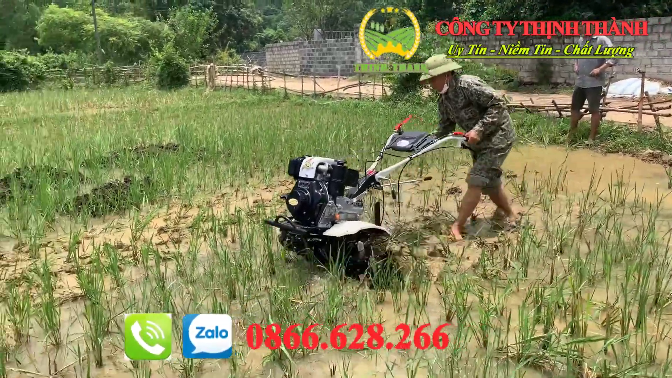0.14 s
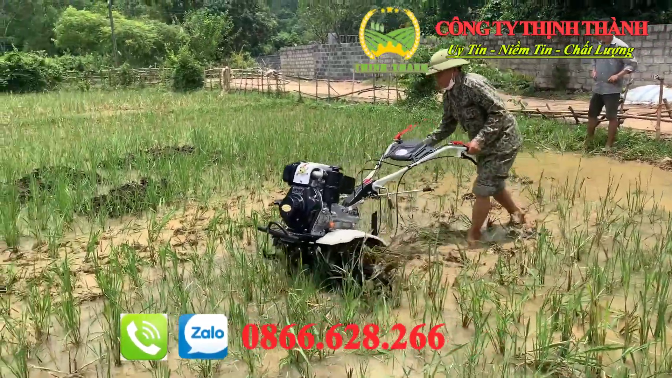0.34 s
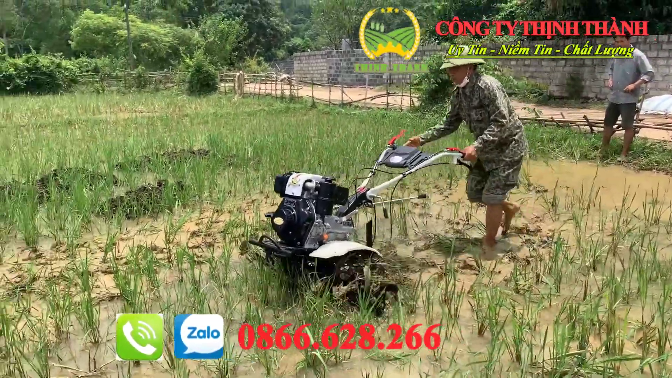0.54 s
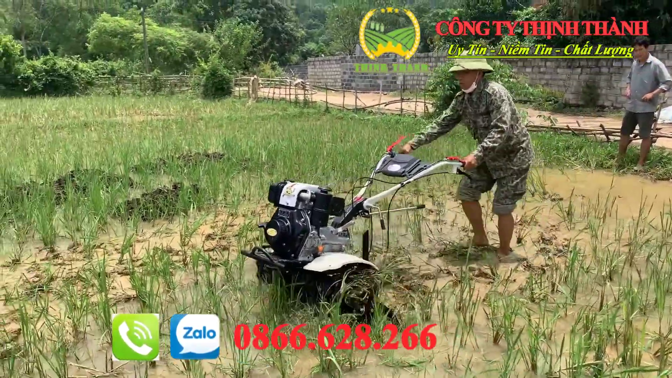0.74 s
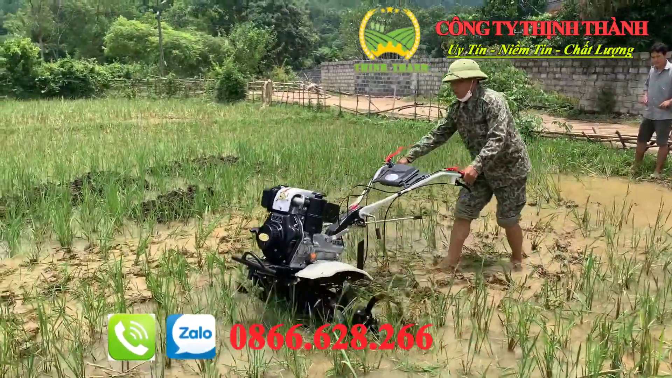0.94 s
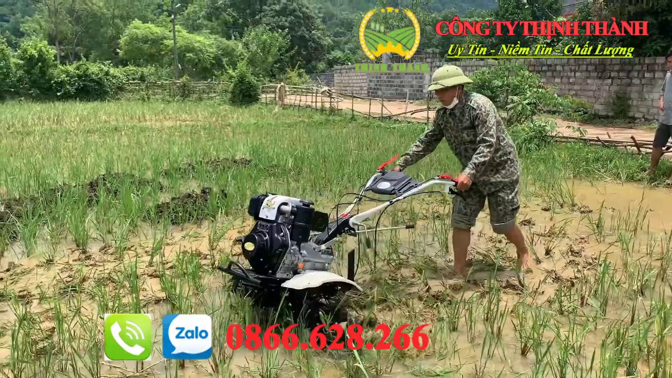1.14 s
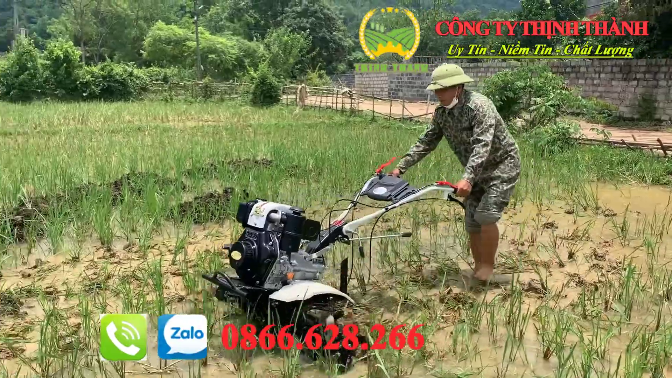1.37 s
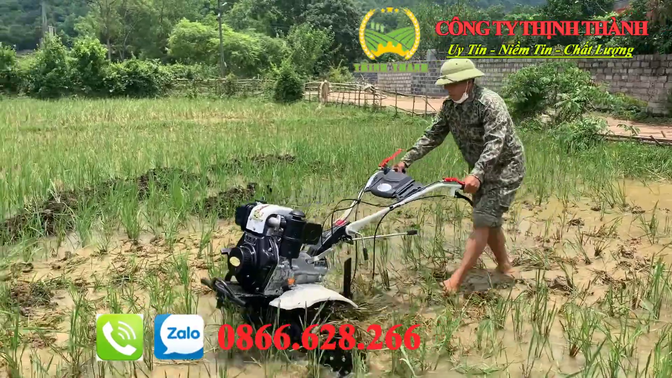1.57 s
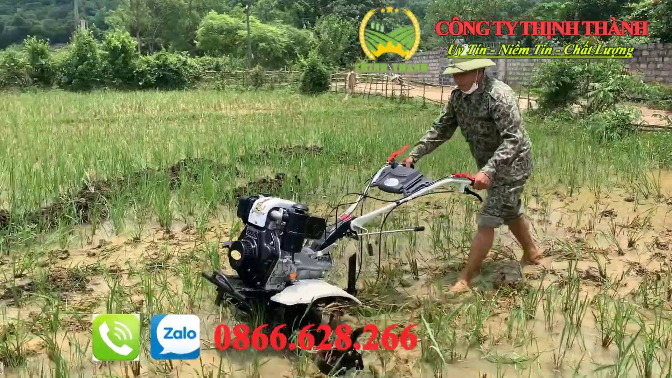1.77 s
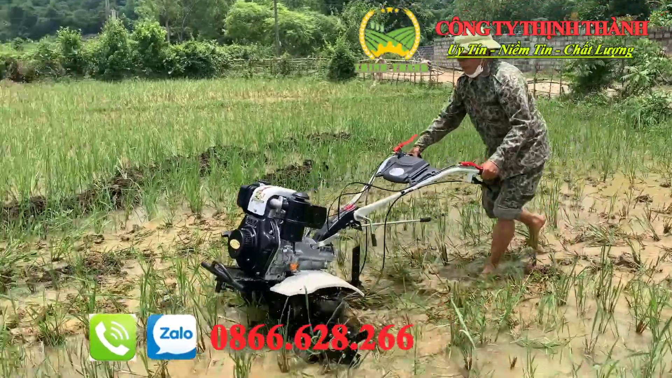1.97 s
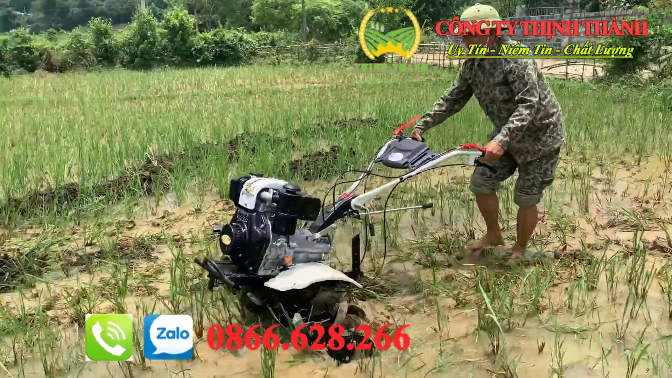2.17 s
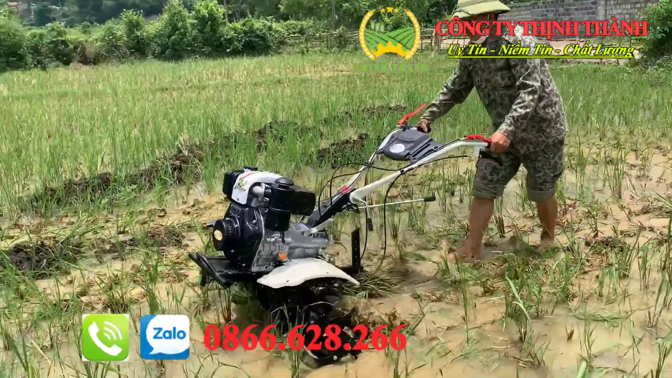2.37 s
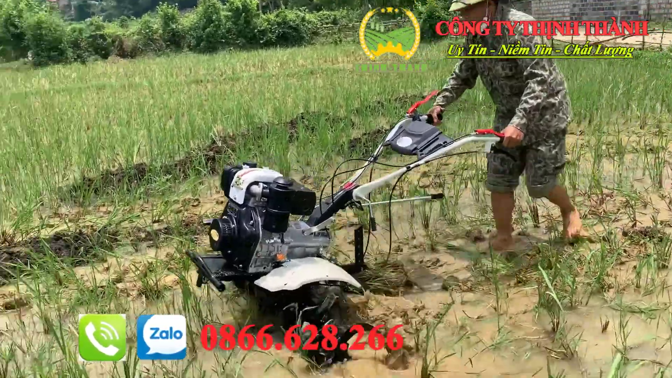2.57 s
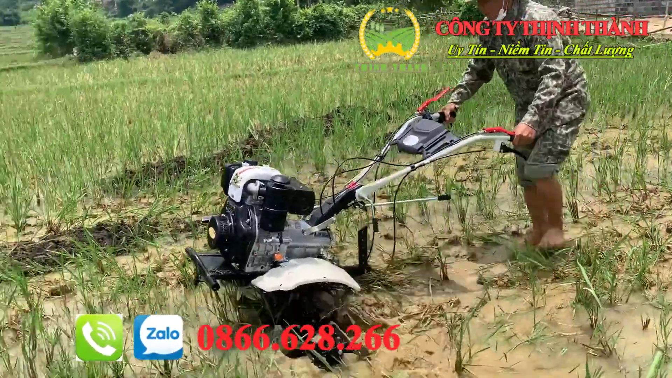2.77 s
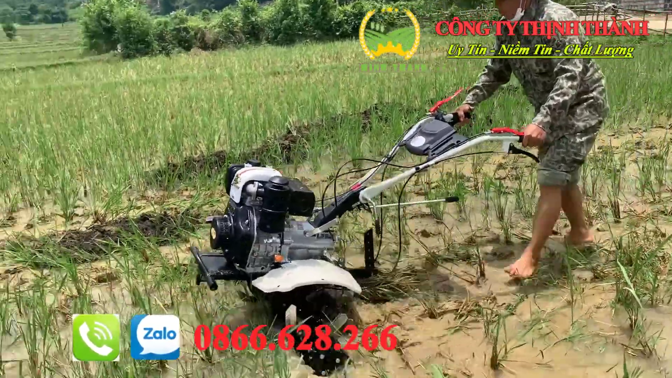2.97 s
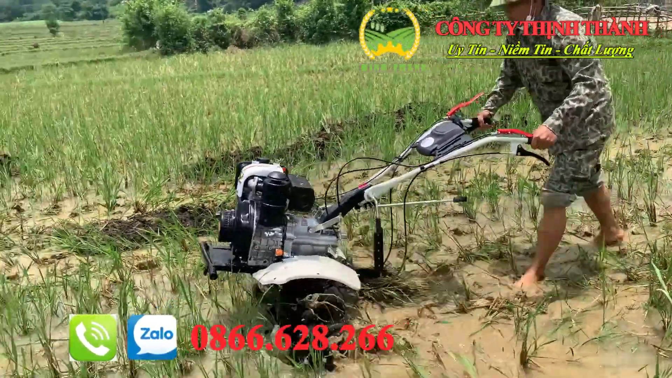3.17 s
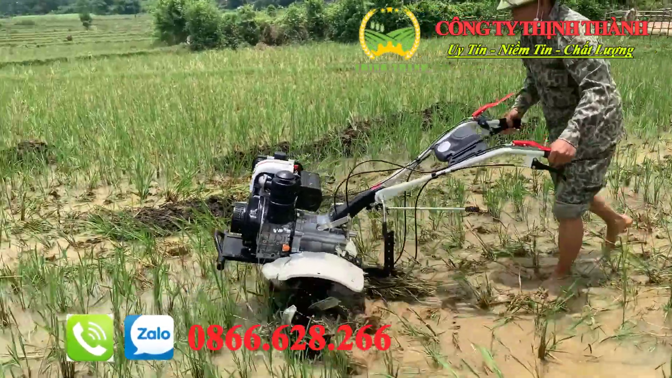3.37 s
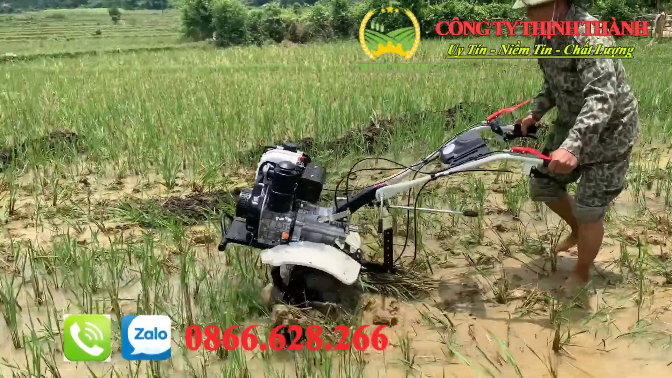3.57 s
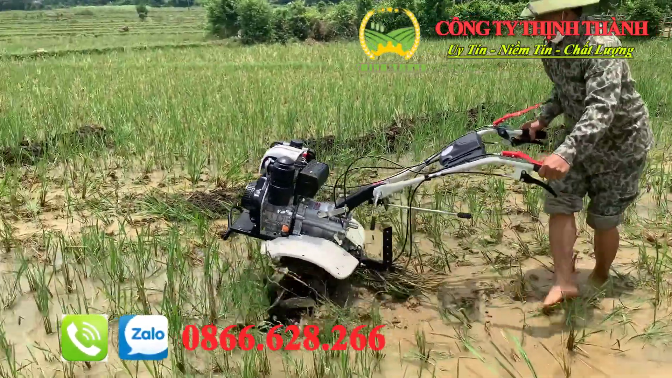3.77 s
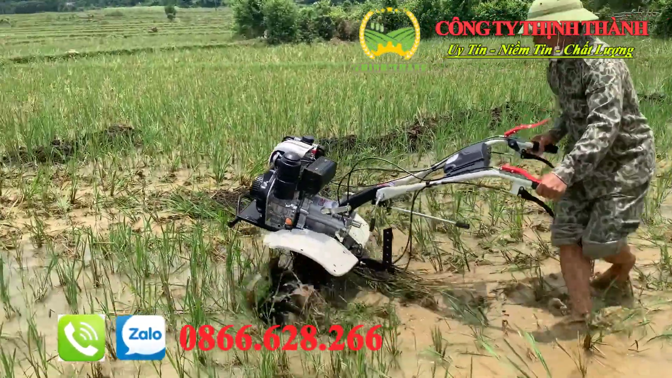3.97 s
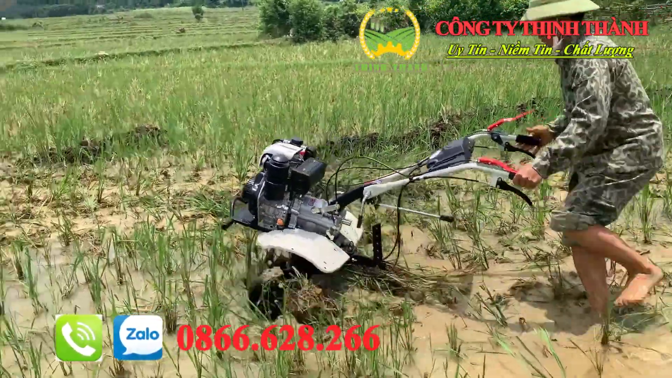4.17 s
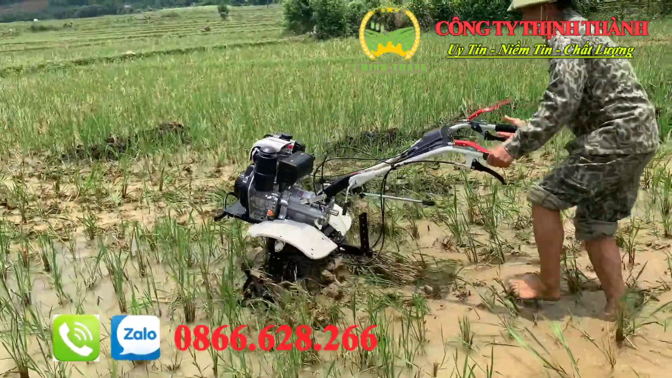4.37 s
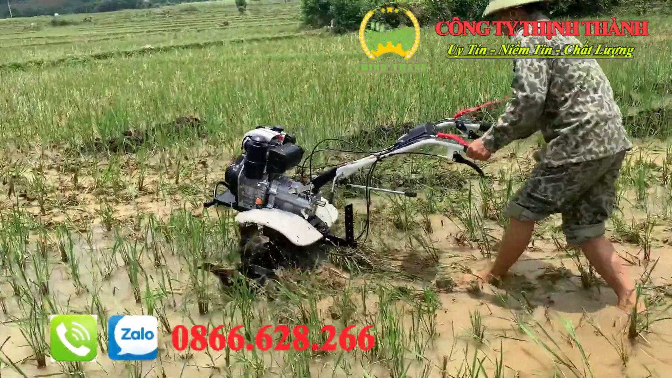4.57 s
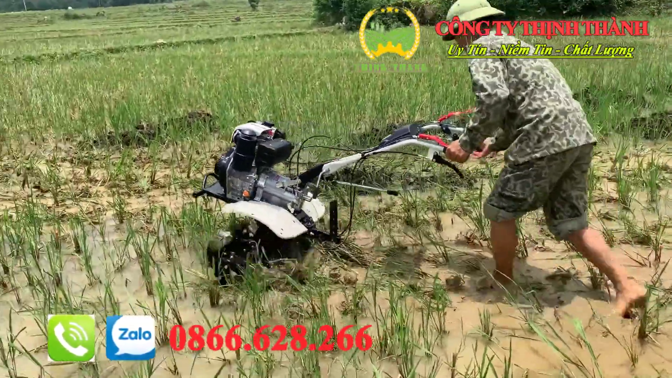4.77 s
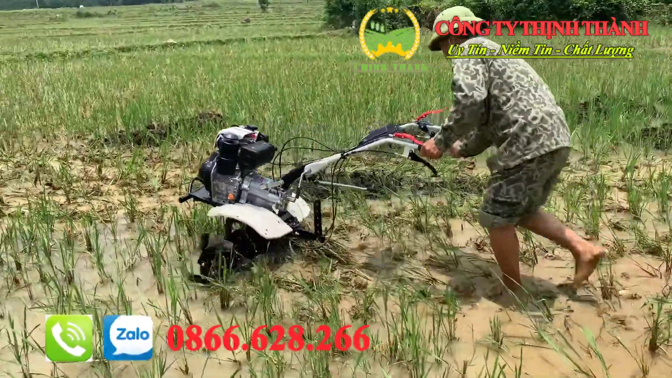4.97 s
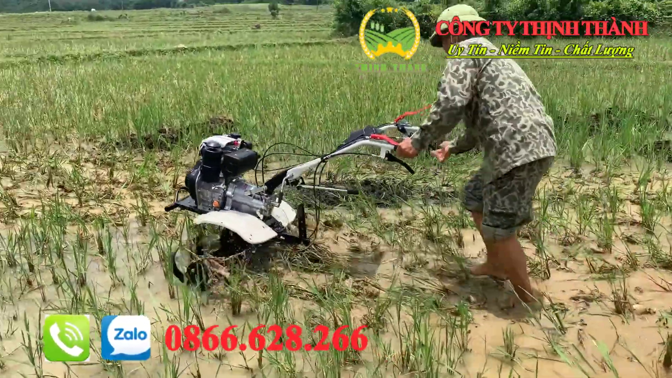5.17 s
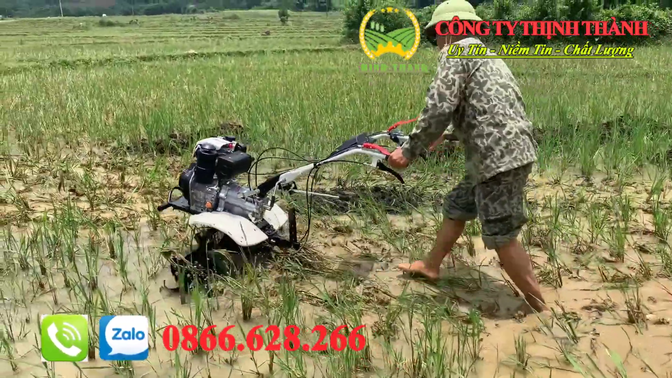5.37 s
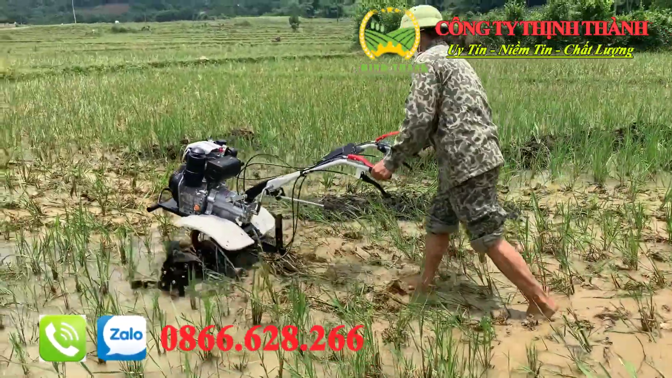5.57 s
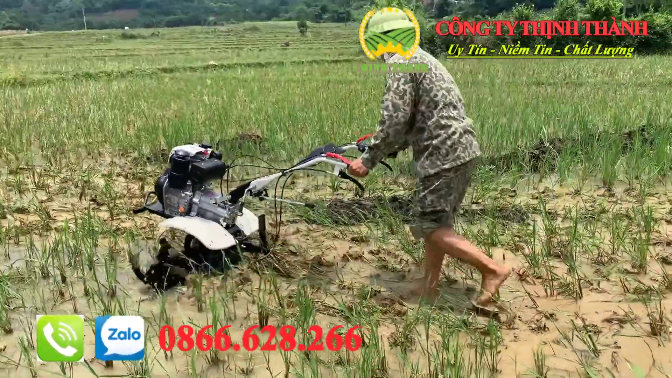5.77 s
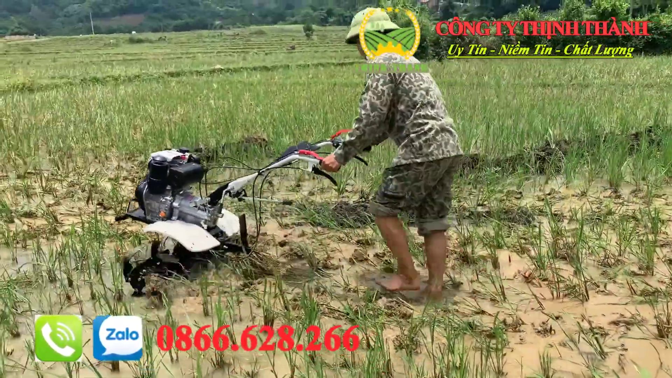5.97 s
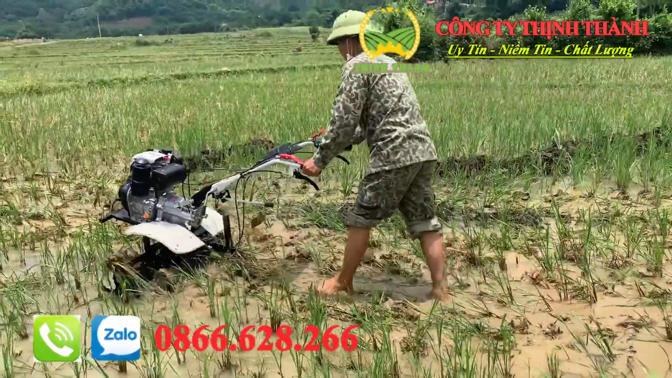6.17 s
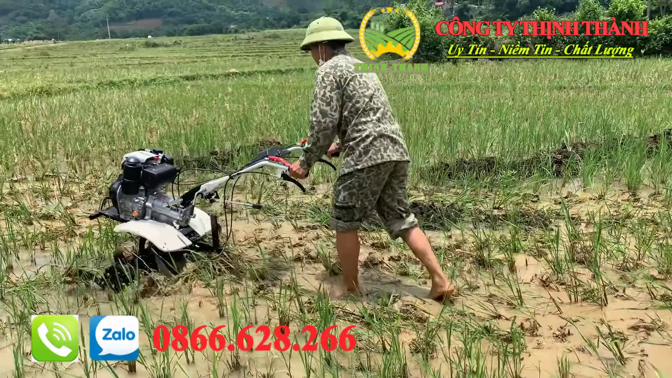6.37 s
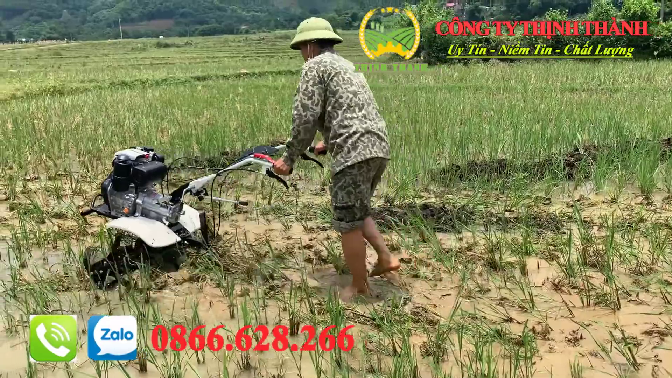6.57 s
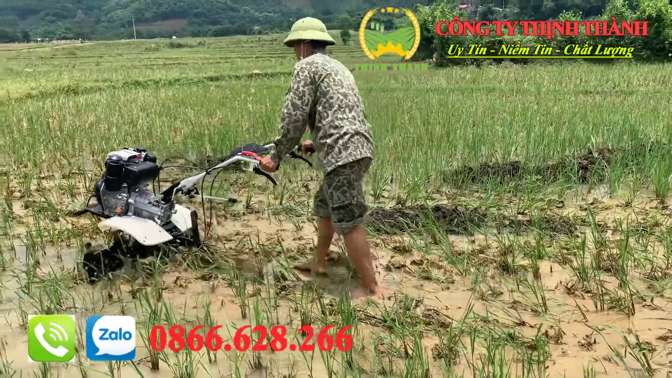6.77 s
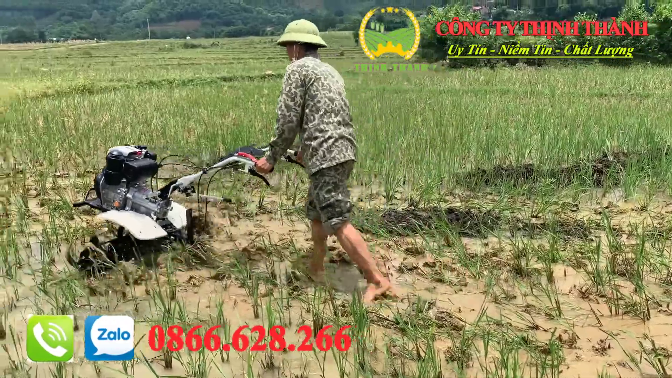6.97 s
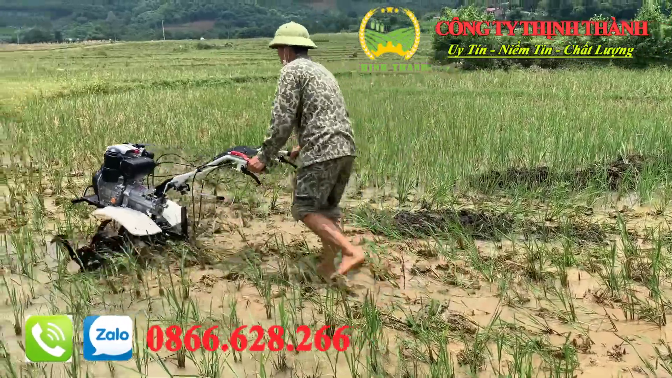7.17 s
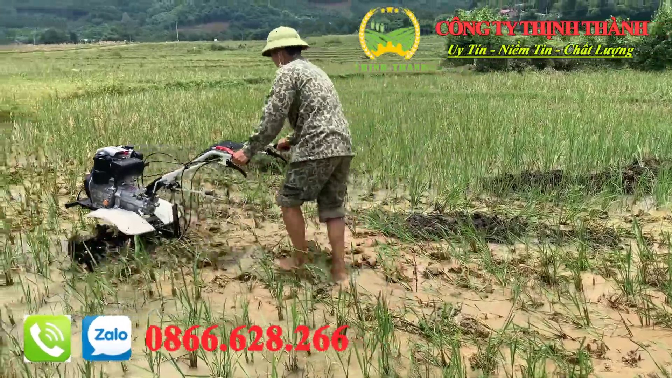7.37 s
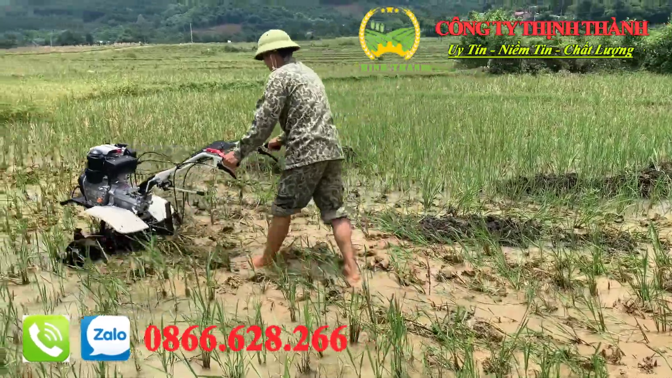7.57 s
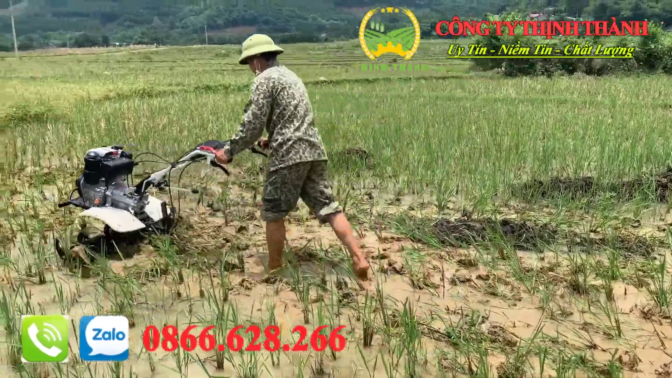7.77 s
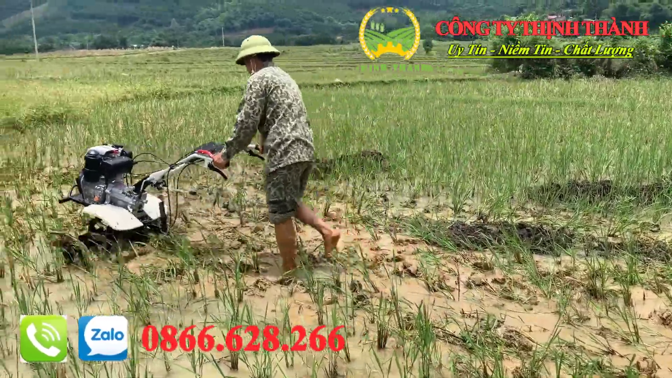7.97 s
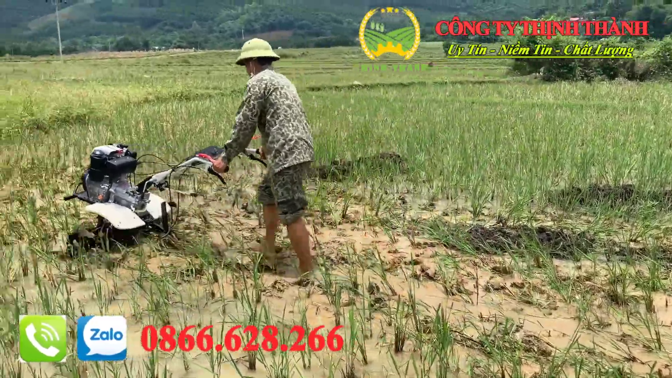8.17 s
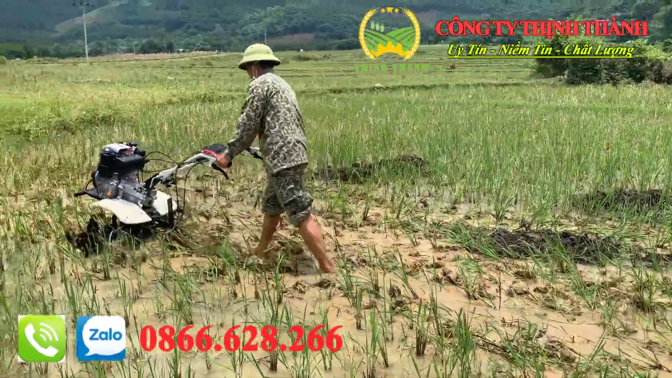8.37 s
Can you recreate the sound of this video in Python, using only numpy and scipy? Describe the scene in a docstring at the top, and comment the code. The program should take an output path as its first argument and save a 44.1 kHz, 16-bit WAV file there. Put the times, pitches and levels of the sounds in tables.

```python
"""Diesel tiller passing in a muddy field

A single-cylinder four-stroke walks by, 2.7 m from a phone's two microphone ports, heard from the front,
then from behind. Each cycle has a combustion knock that rings the casing, an exhaust pop into the
silencer and valve ticks; cooling air and splashing mud hiss in between. A breeze thumps lightly on
the ports, and near the end a thin far whine swells and fades."""
import sys
import numpy as np
from scipy import signal
from scipy.fft import rfft, irfft, next_fast_len
from scipy.io import wavfile

SR = 44100
rng = np.random.default_rng(int(sys.argv[2]) if len(sys.argv) > 2 else 0)


def unload_wav(signal):
    """Save mono or channel-first audio to the path in sys.argv[1] as 16-bit WAV at rate SR, clipped to [-1, 1]."""
    wavfile.write(
        sys.argv[1],
        SR,
        np.round(np.clip(np.atleast_2d(signal).T, -1, 1) * 32767).astype(np.int16),
    )


N = 371763
STEP = 40  # samples per step of slow controls
NEAREST_S, NEAREST_M, WALK_M_PER_S = 3.47, 2.67, 0.76  # a straight walk past the microphone
# moments at which the modes' strengths are given, from front view to rear view
VIEWS_S = (.6, 2.2, 3.4, 4.8, 6.2, 7.8)
FINE_VIEWS_S = (.6, 1.4, 2.1, 2.8, 3.4, 4.0, 4.8, 6.2, 6.9, 7.8)

# engine speed: time_s, cycles_per_s
ENGINE_SPEED = [(0.0, 22.417), (0.24, 22.138), (0.48, 22.409), (0.72, 22.178), (0.96, 22.314),
                (1.2, 22.367), (1.45, 22.212), (1.69, 22.15), (1.93, 22.089), (2.17, 22.075),
                (2.41, 22.165), (2.65, 22.157), (2.89, 22.386), (3.13, 22.225), (3.37, 22.599),
                (3.61, 22.415), (3.85, 22.425), (4.09, 22.31), (4.34, 21.86), (4.58, 21.652),
                (4.82, 21.804), (5.06, 22.022), (5.3, 22.042), (5.54, 21.995), (5.78, 22.022),
                (6.02, 21.922), (6.26, 21.775), (6.5, 21.942), (6.74, 22.063), (6.98, 21.932),
                (7.23, 21.894), (7.47, 22.003), (7.71, 22.316), (7.95, 22.149), (8.19, 22.16),
                (8.43, 22.478)]
# pipe resonances: pitch_hz, t60_s, signed amplitude at each of VIEWS_S
INTAKE_MODES = [(53.7, 0.11, 0.16, 0.17, 0.23, 0.17, 0.16, 0.21),
                (83.4, 0.17, 0.012, -0.025, -0.0037, 0.027, 0.046, 0.022),
                (154, 0.18, -0.018, -0.042, -0.012, 0.003, 0.02, 0.043),
                (180.5, 0.18, -0.01, 0.0098, -0.016, -0.029, -0.033, -0.044),
                (232.4, 0.11, 0.033, 0.0012, -0.0075, -0.005, 0.012, 0.022),
                (318.5, 0.16, -0.004, -0.002, -0.002, -0.016, -0.023, -0.033)]
EXHAUST_MODES = [(50.4, 0.17, 0.13, 0.11, 0.137, 0.088, 0.092, 0.14),
                 (88.2, 0.078, 0.216, 0.26, 0.26, 0.19, 0.21, 0.28),
                 (129.7, 0.21, -0.14, -0.13, -0.14, -0.092, -0.094, -0.098),
                 (159.2, 0.065, -0.066, -0.1, -0.019, -0.042, -0.019, 0.0033),
                 (194.9, 0.058, -0.083, -0.084, -0.07, 0.012, 0.0073, 0.011),
                 (263, 0.107, -0.0051, -0.0032, 0.017, -0.016, -0.018, -0.034),
                 (283.4, 0.14, -0.011, -0.0045, -0.011, 0.0036, 0.0054, 0.0098),
                 (367.7, 0.12, 0.002, 0.025, 0.02, -0.0014, -0.0054, -0.0184),
                 (424.3, 0.16, -0.014, -0.024, -0.016, -0.0114, 0.001, 0.0019),
                 (485.5, 0.17, -0.002, 0.00018, 0.0135, 0.0086, 0.0025, 0.0036)]
# resonances of the pop and the bright parts: pitch_hz, t60_s, relative level_db at each of VIEWS_S
POP_MODES = [(638, 0.023, 6.5, 11, 7.6, 8, 5, 5), (790, 0.02, 3.5, 6.5, 3, 0, -10, -2),
             (875, 0.03, 10.5, -28, 8.7, 10, 8, 12.5), (973, 0.06, -6, 5, 4.8, 3, -4, 11.5)]
COVER_MODES = [(2106, 0.021, 13, 15, 9.5, 14, 6, -18), (2257, 0.057, 8, 3, 3.5, -4, 1, 6.5),
               (2473, 0.061, 1.5, 3, 5, 2.5, 5, 5), (2830, 0.048, -3, 0, -1, -0.5, 1.5, -26),
               (3055, 0.031, 7.5, 1, 2, 3, -4, 1.5), (3328, 0.038, 6, 4.5, 7, 4, 9.5, 4.5),
               (3560, 0.071, -2, 3, -4, 2, 8, 4)]
SHROUD_MODES = [(3814, 0.044, 3, 13, -4, -1, 14, -16), (4150, 0.025, 10.5, 7.5, -9, 3.5, 9.5, 1.5),
                (4450, 0.076, -1, 5, -11, -1, -7, -2), (4560, 0.041, 8.5, -1, -2, -19, -9, -10),
                (4860, 0.022, 14, 4, -6, 1.5, 6, 5), (5070, 0.037, -9, -11, -1, 0, -10, 6)]
FIN_MODES = [(5836, 0.032, 3.5, 1.5, 2, 1, 3, 7.5), (7590, 0.016, -4.5, -8, -3, -4, 2, -0.5),
             (8040, 0.063, 1, 3.5, 6.5, -0.5, 4, 0)]
# resonances of the heavy parts: pitch_hz, t60_s, relative level_db at each of FINE_VIEWS_S
CRANKCASE_MODES = [(697, 0.025, 9.5, 6, 11.5, 18.5, 23, 23.5, 27, 19, -17, -4),
                   (896, 0.052, -32, -30, -30, -23, -11, 1, 19.5, 14, -12, -31),
                   (957, 0.053, 3, 1.5, -1, 7, 11, 16.5, 18, 19.4, 13.5, 2.5),
                   (1057, 0.073, -29, 1, 7, 12, 11, -12, 20, 20.7, 14.5, 9),
                   (1161.4, 0.075, -38, -3, 3, 10, -5, 13, -6, 9.7, 10, -2),
                   (1214, 0.16, -15, -12, -3, 9, 1, 0, -5, 8, 6, -1)]
CYLINDER_MODES = [(1272, 0.035, 21, 10, -29, -9, 9, -18, -26, -23, -18, -7),
                  (1462.5, 0.17, 7, 10, 16, 12, 4, 11, 8, -11, -4, 9),
                  (1570, 0.033, 12, 20.5, 26, 17, 15, 17, 15.5, -2.5, -7, 15),
                  (1644, 0.053, 8, 2, 8, -10, -13, 14, 9, -4, -0.5, -3),
                  (1725, 0.041, -2, -13, -7, 14, 21, 5.5, -1, -24, -28, -19),
                  (1835, 0.14, 5.5, 4, 1, 6, 13, 8, 3, -6, -3, 1.5),
                  (1895, 0.017, 0, 16, 29.5, 20, 24, -12, -30, -40, -43, -43)]
# blows within one engine cycle: position_cycles, level_db, scatter_db, rattle_s
POP_BLOWS = [(.525, 0, .7, .002), (.615, -12, 1, .002)]
KNOCK_BLOWS = [(.02, -6, .8, .001), (.042, 0, .8, .002)]
REBOUND_BLOWS = [(.155, 0, 1, .003), (.26, -6, 1.5, .004)]
BRACKET_JOLTS = [(.06, 0, 1, .002), (.56, 0, 1, .002)]
VALVE_TICKS = [(0.021, 1.5, 4.5, 0.0049), (.13, -28, 1.9, 0.0055), (.51, -9, 5.1, 0.0032),
               (.805, 6.5, 3.3, 0.00094)]
# knock and pop shift in the cycle as load and path change: time_s, knock_delay_ms, pop_delay_ms
FIRING_DELAYS = [(0, -1.8, -.2), (.8, -1.3, 0), (1.4, -.3, -.1), (1.9, 0, 0), (2.4, .4, -1.2),
                 (3.3, .4, -1.3), (3.7, -1.2, -1.2), (4.1, -.8, -.7), (4.5, -.2, 0), (5.7, -.4, -.1),
                 (6.2, -.3, 0), (7.5, -.35, -.1), (8.43, -.4, -.2)]
# strength of the rebounds after the knock: time_s, gain_db
REBOUND_LEVELS = [(0, -5.5), (.8, -2.5), (1.4, -1), (2.0, -6), (2.5, -2.5), (3.3, -7), (3.9, -7),
                  (4.8, -11), (5.6, -6.5), (6.5, -24), (7.5, -1.5), (8.43, -10)]
# parts face the microphone in turn, before distance loss: time_s, pop_db, crankcase_db, cylinder_db
LOW_FACING = [(0, -29, -20.5, -24.5), (1.2, -27, -20, -26.5), (2.2, -30.5, -21, -33),
              (2.9, -28, -25.5, -33.5), (3.6, -31.5, -28, -28.5), (4.3, -29, -32, -24),
              (5.0, -30, -33.5, -19), (5.6, -28, -31, -12), (6.4, -26, -32, -10.5), (7.2, -28, -22, -17),
              (7.8, -33.5, -20.5, -29), (8.43, -30.5, -19, -24)]
# the same for the bright parts: time_s, covers_db, valves_db, shroud_db
BRIGHT_FACING = [(0, 3.5, -2, -7), (.7, 2, -2, -5.5), (1.4, 0, -2, -2.5), (2.3, 3, -1.5, -4.5),
                 (2.9, 4.5, -2, 1), (3.35, 3, 0.5, 9.5), (3.7, 3.5, -2, 6.5), (4.3, 4, -1, 8),
                 (4.8, 2, -2.5, 3.5), (5.3, 7, -1.5, 0), (6.0, 4.5, -1.5, -5), (6.7, 3.5, 0, -2.5),
                 (7.7, 7, 0.5, 2.5), (8.43, 6, 0, 1.5)]
# the bracket's ring, before distance loss: time_s, level_db
BRACKET_LEVELS = [(0, -48), (2.0, -46), (2.8, -48), (3.3, -38), (4.0, -42), (4.6, -41.5), (5.1, -35),
                  (5.4, -40), (6.3, -38.5), (6.7, -38), (7.1, -35), (7.5, -38), (8.43, -42)]
# spectrum of cooling air and mud: frequency_hz, ahead_db, behind_db
RUSH_SPECTRUM = [(99, -16, -6), (145, -12, -15), (230, -6.5, -9), (333, -14, -15.5), (467, -15, -19.5),
                 (600, -11, -17), (805, -7, -10), (1280, -7, -11), (2040, -6, -14), (2440, -10, -14),
                 (2800, -9, -15), (3240, -13, -14.5), (3980, -12, -14), (4500, -11, -13.5),
                 (4800, -10.5, -11.5), (5200, -14, -16), (7050, -23, -28.5), (9000, -56, -37)]
# spectrum of the valve and fan hiss: frequency_hz, level_db
HISS_SPECTRUM = [(5000, 1.5), (6500, 4), (8200, -1.5), (9500, 3), (11000, 3.5), (12500, 0.5), (14000, 3),
                 (15900, -41)]
# light gusts on the ports: peak_s, level_db
GUSTS = [(.13, -38), (5.13, -41)]


def from_db(db):
    """Decibels to gain."""
    return 10 ** (np.asarray(db) / 20)


def rms_one(x):
    """Scale to unit rms."""
    return x / np.sqrt(np.mean(x ** 2) + 1e-20)


def in_time(rows):
    """Columns of a curve table, one value per sample."""
    times_s, *columns = np.transpose(rows)
    return [np.interp(np.arange(N) / SR, times_s, column) for column in columns]


def swell(peak_s, half_s):
    """A bell-shaped rise and fall of height 1."""
    return np.exp(-((np.arange(N) / SR - peak_s) / half_s) ** 2)


def slow_drift(rate_hz):
    """Slow random wander of rms 1, one value per step."""
    pole = np.exp(-2 * np.pi * STEP * rate_hz / SR)
    wander = signal.lfilter([1], [1, -2 * pole, pole * pole], rng.standard_normal(N // STEP + 2002))
    return rms_one(wander[2000:])


def drift(rate_hz):
    """Slow random wander, one value per sample."""
    slow = slow_drift(rate_hz)
    return np.interp(np.arange(N) / STEP, np.arange(len(slow)), slow)


def late(x, ms):
    """Delay x by a steady or moving time."""
    return np.interp(np.arange(N) - ms * SR / 1000, np.arange(N), x)


def ports(x, apart):
    """Mix a shared and an opposed signal into the left and right ports."""
    return np.array([[1, apart], [1, -apart]]) @ x


def ring(clicks, hz, t60_s):
    """A unit click sets a sine of height 1 ringing."""
    pole, angle = from_db(-60 / (t60_s * SR)), 2 * np.pi * hz / SR
    return signal.lfilter([0, np.sin(angle)], [1, -2 * pole * np.cos(angle), pole ** 2], clicks + 1e-18)


def coloured(x, hz, db):
    """Filter x through a curve of levels at given frequencies; rms 1."""
    size = next_fast_len(N)
    bins_hz = np.arange(size // 2 + 1) * SR / size
    gain = from_db(np.interp(np.log(bins_hz + 1), np.log(hz), db, left=-90, right=-90))
    return rms_one(irfft(rfft(x, size) * gain, size)[..., :N])


def train(cycle, position, heights, jitter_s=0.):
    """One click each time the engine passes a position in its cycle."""
    passes = np.arange(int(cycle[-1]) + 1) + position
    at = np.interp(passes, cycle, np.arange(N), right=N + SR)
    at += SR * jitter_s * rng.standard_normal(len(passes))
    heard = at < N
    clicks = np.zeros(N)
    clicks[np.clip(at[heard], 0, N - 1).astype(int)] = heights[heard]
    return clicks


def contacts(cycle, blows, jitter_s):
    """The clicks of every cycle, and the envelope of the rattle that dies away after each."""
    clicks, rattle = 0, 0
    for position, db, scatter_db, rattle_s in blows:
        heights = from_db(db + scatter_db * rng.standard_normal(int(cycle[-1]) + 1))
        hits = train(cycle, position, heights, jitter_s)
        clicks += hits
        rattle += signal.lfilter([1], [1, -np.exp(-1 / (rattle_s * SR))], hits + 1e-18)
    return np.array([clicks, rattle])


def struck(modes, blows, rattle, shake, apart, views_s=VIEWS_S, wander_db=1.3):
    """Clicks, the loose rattle after them and a steady shake ring modes that each radiate their own way."""
    clicks, envelope = blows
    noise = rng.standard_normal((2, N)) * (rattle * envelope + shake)
    tone = 0
    for k, (hz, t60_s, *views_db) in enumerate(modes):
        shared, opposed = clicks + noise[0], noise[1] - clicks * (-1) ** k
        wander = wander_db * slow_drift(rate_hz=.63)
        level_db = np.interp(np.arange(len(wander)) * STEP / SR, views_s, views_db) + wander
        tone += np.repeat(from_db(level_db), STEP)[:N] * ring(np.array([shared, opposed]), hz, t60_s)
    # a part radiates only around its own modes
    band_hz = [1.036 * modes[0][0], .9616 * modes[-1][0]]
    tone = signal.sosfilt(signal.butter(3, band_hz, "band", fs=SR, output="sos"), tone)
    return ports(tone / np.sqrt(np.mean(tone[0] ** 2)), apart)


def silencer(cycle, intake_at=.1818, blow_down_at=.418):
    """Two pressure pushes a cycle ring the intake and exhaust pipes, nearly the same every time."""
    uneven = from_db(.22 * rng.standard_normal((2, int(cycle[-1]) + 1)))
    tone, seconds = 0, np.arange(N) / SR
    for modes, position, heights in zip((INTAKE_MODES, EXHAUST_MODES), (intake_at, blow_down_at), uneven):
        pushes = train(cycle, position, heights)
        for hz, t60_s, *amplitudes in modes:
            tone += ring(np.interp(seconds, VIEWS_S, amplitudes) * pushes, hz, t60_s)
    # an open pipe radiates little deep bass
    return signal.sosfiltfilt(signal.butter(4, 32, "high", fs=SR, output="sos"), tone)


def combustion(cycle, turned):
    """The firing knock and its rebounds: blows for the heavy parts, and a crack for the bright ones."""
    first = contacts(cycle, KNOCK_BLOWS, jitter_s=1e-5)
    rebounds = from_db(in_time(REBOUND_LEVELS)[0]) * contacts(cycle, REBOUND_BLOWS, jitter_s=2e-5)
    # the crack has weaker rebounds, changes from firing to firing and is softer from behind
    scatter_db = 1.6 * rng.standard_normal(int(cycle[-1]) + 2)
    crack_db = scatter_db[(cycle + .25).astype(int)] - 5 * turned
    return first + rebounds, from_db(crack_db) * (first + from_db(-7) * rebounds)


def air_and_mud(crack_rattle, turned):
    """Cooling air and churned mud, with a broad crack at each knock; hollower from behind."""
    noise = rng.standard_normal((2, N)) * (1 + .5 * crack_rattle) * from_db(1.03 * drift(rate_hz=11))
    hz, ahead_db, behind_db = np.transpose(RUSH_SPECTRUM)
    rush = (1 - turned) * coloured(noise, hz, ahead_db) + turned * coloured(noise, hz, behind_db)
    return ports(rush, apart=.43)


def valves_and_fan(cycle, spatters_per_s=600):
    """Bright hiss that flares at every valve tick, with scattered mud spatter."""
    ticks = [(at, db, min(scatter_db, 3), rattle_s) for at, db, scatter_db, rattle_s in VALVE_TICKS]
    _, rattle = contacts(cycle, ticks, jitter_s=.00098)
    drops = rng.random((2, N)) < spatters_per_s / SR
    spatter = drops * from_db(4 * np.minimum(rng.exponential(1, (2, N)), 4))
    hiss = rng.standard_normal((2, N)) * (1 + rattle + .17 * spatter) * from_db(.84 * drift(rate_hz=6.3))
    return ports(coloured(hiss, *np.transpose(HISS_SPECTRUM)), apart=.33)


def bracket(cycle, hz=963, t60_s=.16, shake=.004):
    """A lightly damped bracket, kept ringing by a jolt each crank turn and a steady shake."""
    jolts, _ = contacts(cycle, BRACKET_JOLTS, jitter_s=1e-5)
    tone = ring(jolts + shake * rng.standard_normal(N), hz, t60_s)
    return from_db(in_time(BRACKET_LEVELS)[0]) * rms_one(ring(tone, hz, t60_s / 4))


def exhaust_pop(cycle):
    """Exhaust bursts into the silencer once a cycle and rings briefly."""
    blows = contacts(cycle, POP_BLOWS, jitter_s=4e-5)
    return struck(POP_MODES, blows, rattle=.003, shake=.001, apart=.21)


def wind(breeze_db=-51, band_hz=(40, 69.6)):
    """A breeze rumbles on the microphone ports, and light gusts thump them."""
    level = from_db(breeze_db) + sum(from_db(db) * swell(peak_s, half_s=.06) for peak_s, db in GUSTS)
    band = signal.butter(2, band_hz, "band", fs=SR, output="sos")
    rumble = signal.sosfilt(band, rng.standard_normal((2, N)))
    return level * ports(rms_one(rumble), apart=.4)


def far_whine(hz=4970, t60_s=.04):
    """A thin far whine swells and fades: noise twice through a narrow resonance."""
    tone = ring(ring(rng.standard_normal(N), hz, t60_s), hz, t60_s)
    return rms_one(tone) * swell(peak_s=7.5, half_s=.33)


def scene():
    """The tiller walks past the two ports, with the whine and the breeze over it."""
    seconds = np.arange(N) / SR
    along_m = WALK_M_PER_S * (seconds - NEAREST_S)
    distance_m = np.hypot(along_m, NEAREST_M)
    rear = along_m / distance_m  # -1 heard from ahead, 1 from behind
    turned = np.clip(rear / .46, 0, 1)  # share of the rear colour
    cycle = np.cumsum(in_time(ENGINE_SPEED)[0]) / SR - .057
    pop_db, crankcase_db, cylinder_db = in_time(LOW_FACING)
    covers_db, valves_db, shroud_db = in_time(BRIGHT_FACING)
    knock_ms, pop_ms = in_time(FIRING_DELAYS)
    knock, crack = combustion(late(cycle, knock_ms), turned)

    low = from_db([[.95], [1.15]]) * silencer(cycle)
    low += from_db(pop_db) * exhaust_pop(late(cycle, pop_ms))
    crankcase = struck(CRANKCASE_MODES, knock, rattle=.005, shake=.0012, apart=.21, views_s=FINE_VIEWS_S)
    cylinder = struck(CYLINDER_MODES, knock, rattle=.008, shake=.002, apart=.088, views_s=FINE_VIEWS_S)
    low += from_db(crankcase_db) * crankcase + from_db(cylinder_db) * cylinder + bracket(cycle)
    low *= from_db([[-1.35], [1.35]])  # the lower notes are louder at the right port

    covers = struck(COVER_MODES, crack, rattle=.05, shake=.008, apart=.37)
    covers[1] = late(covers[1], ms=.074)  # the covers reach the left port first
    shroud = struck(SHROUD_MODES, crack, rattle=.08, shake=.012, apart=.98)
    middle = from_db(covers_db - 35) * covers + from_db(shroud_db - 37.5) * shroud
    middle += from_db(.5 * rear - 28) * air_and_mud(crack[1], turned)

    treble = from_db(valves_db - 33.5) * valves_and_fan(cycle)
    treble += from_db(-37) * struck(FIN_MODES, crack, rattle=.3, shake=.06, apart=.12)

    bend_samples = round(.000302 * SR)  # high notes bend round the phone to the left port
    right_lag_ms = .011 + .016 * seconds  # the machine moves to the left
    left = low[0] + middle[0] + np.roll(treble[0], bend_samples)
    right = late(low[1] + middle[1], right_lag_ms) + treble[1]
    return NEAREST_M / distance_m * np.array([left, right]) + from_db(-46) * far_whine() + wind()


def record(dry):
    """The phone cuts the top steeply, 60 dB down at 15850 Hz."""
    return signal.sosfilt(signal.cheby2(20, 60, 15850, fs=SR, output="sos"), dry)


dry = scene()
out = record(dry)
unload_wav(out)
```